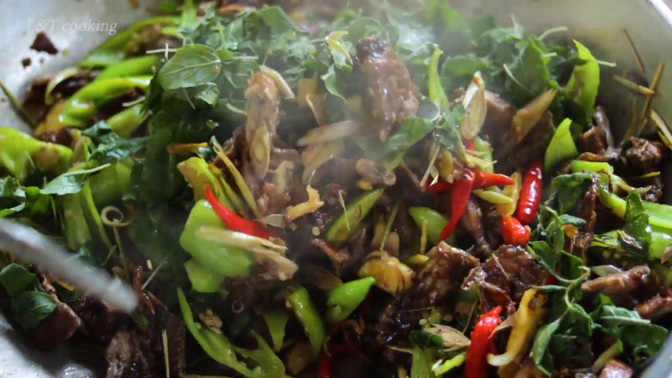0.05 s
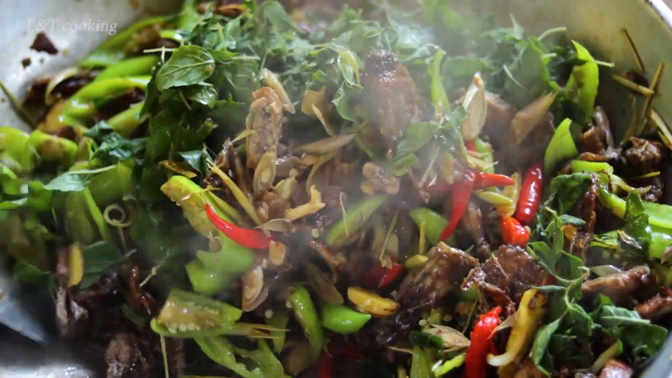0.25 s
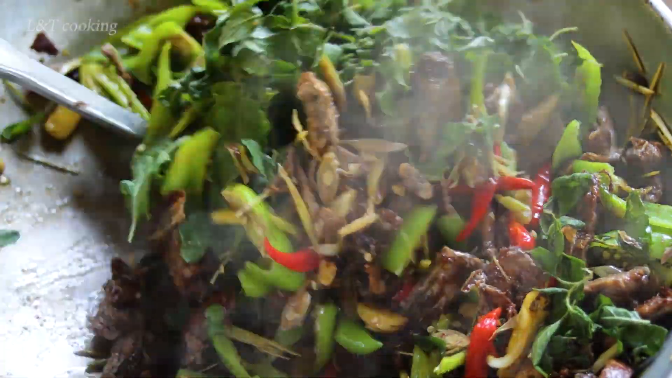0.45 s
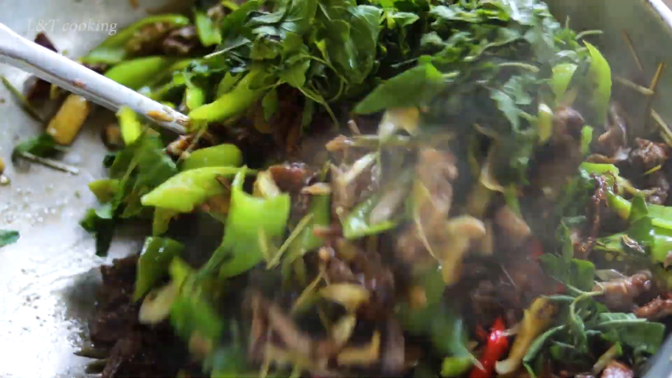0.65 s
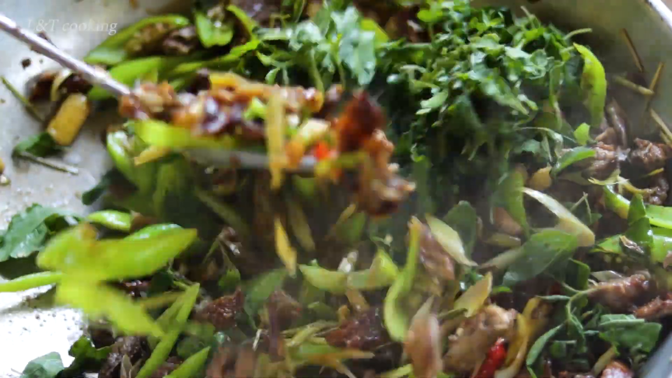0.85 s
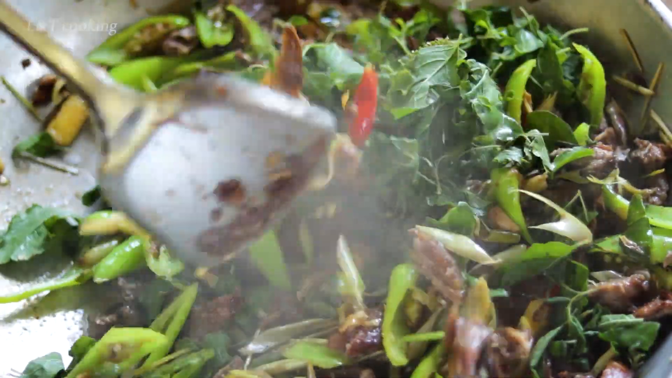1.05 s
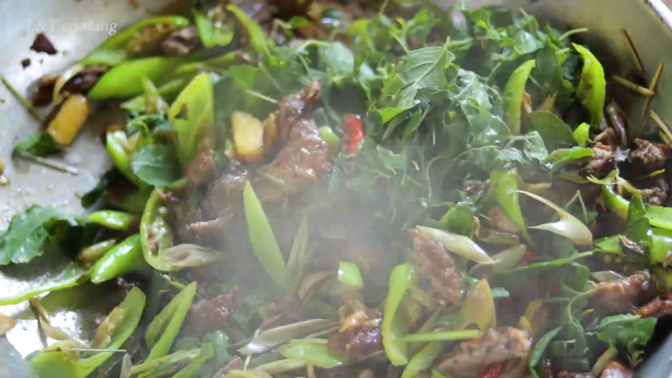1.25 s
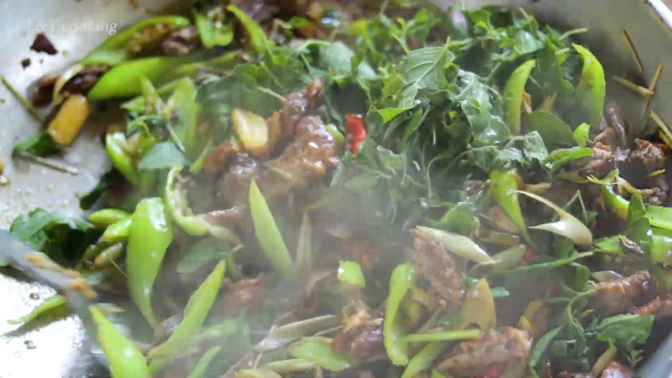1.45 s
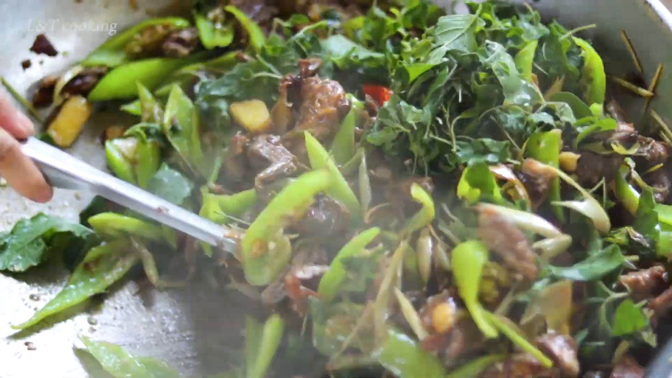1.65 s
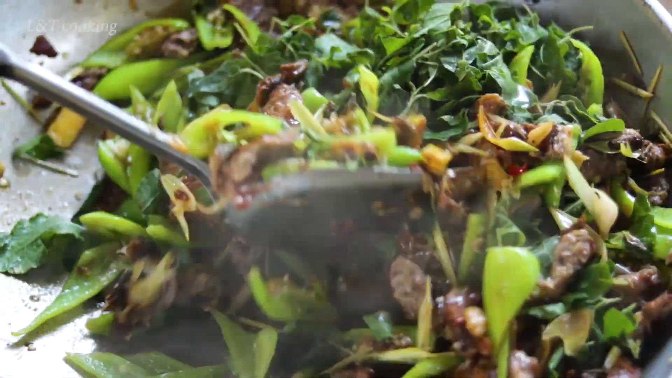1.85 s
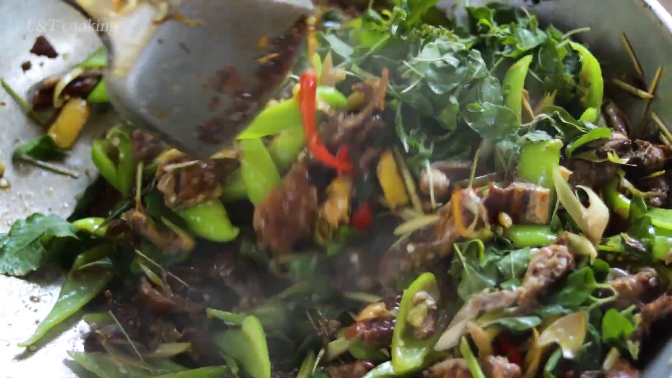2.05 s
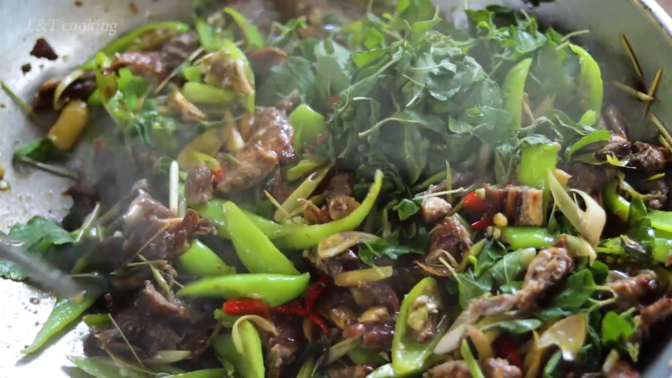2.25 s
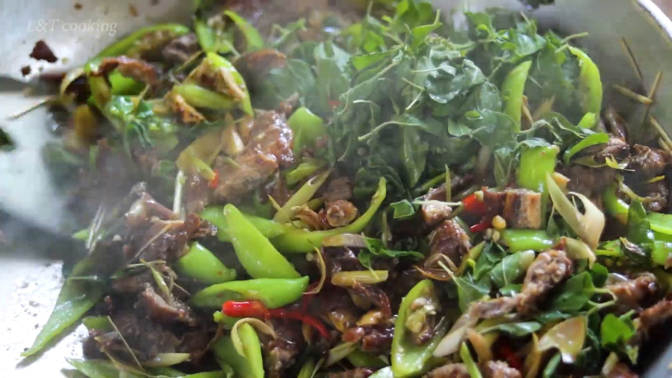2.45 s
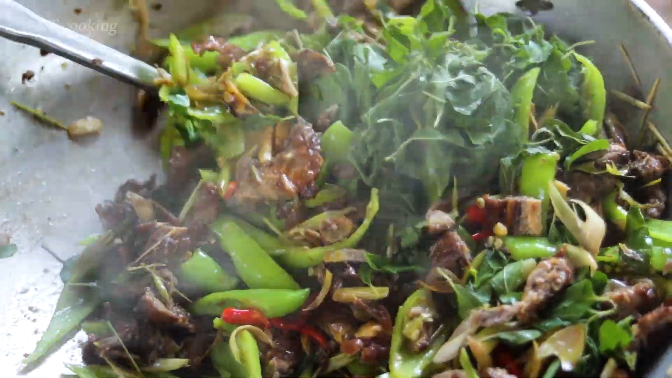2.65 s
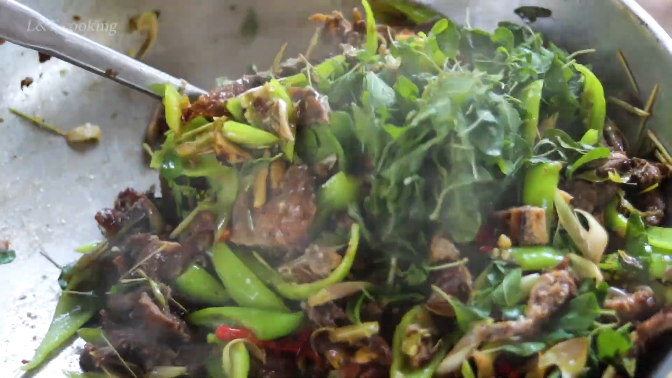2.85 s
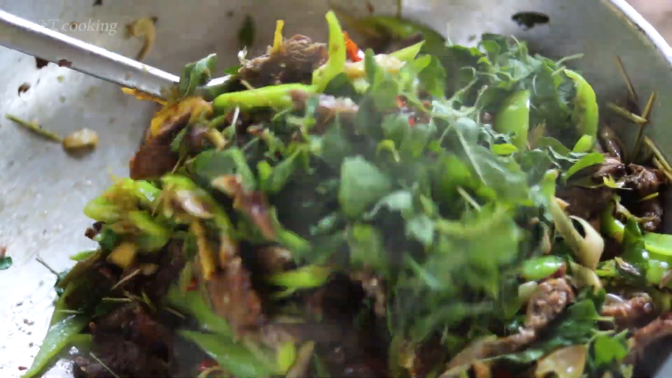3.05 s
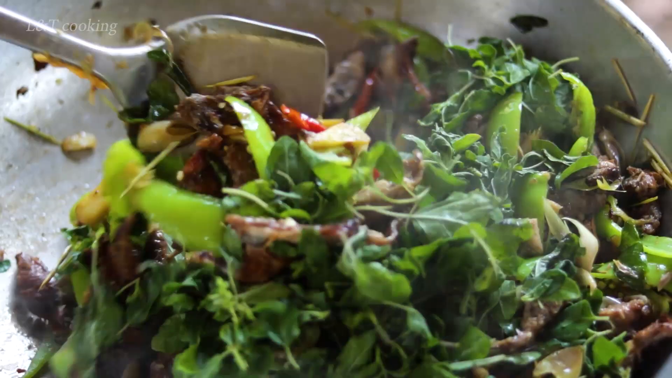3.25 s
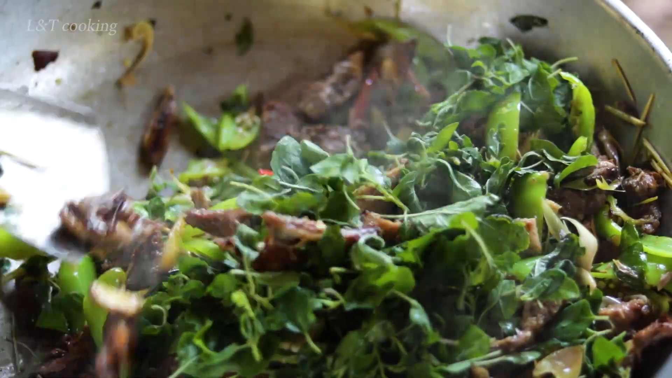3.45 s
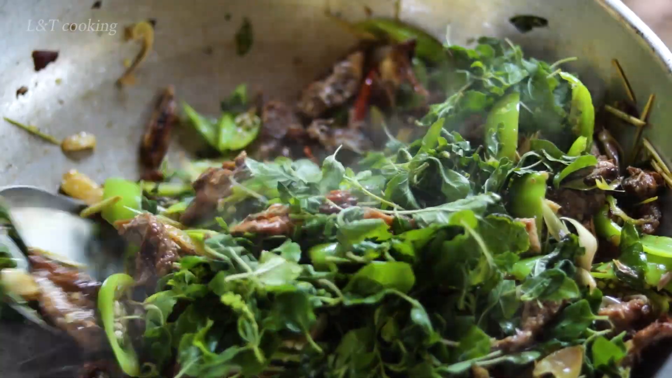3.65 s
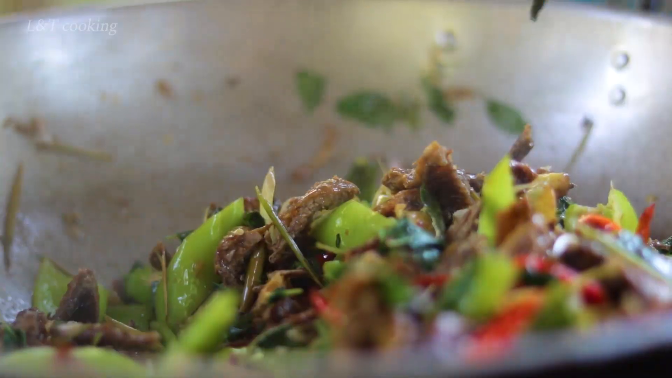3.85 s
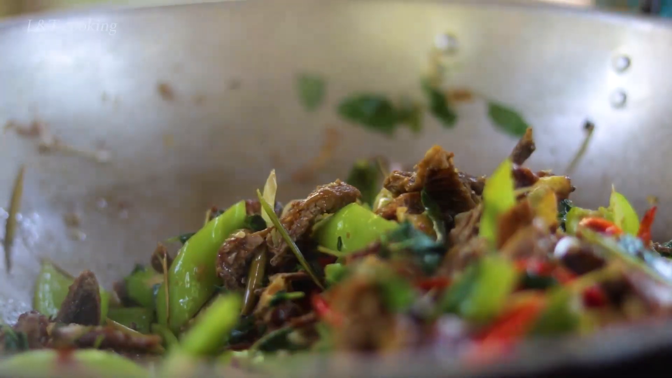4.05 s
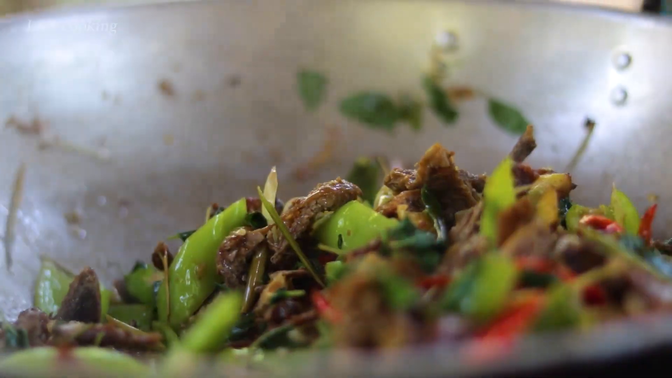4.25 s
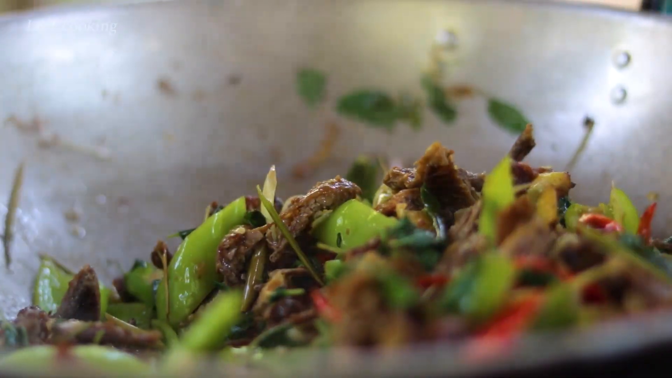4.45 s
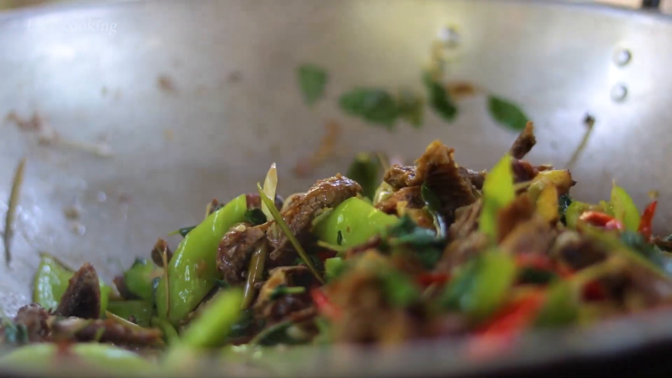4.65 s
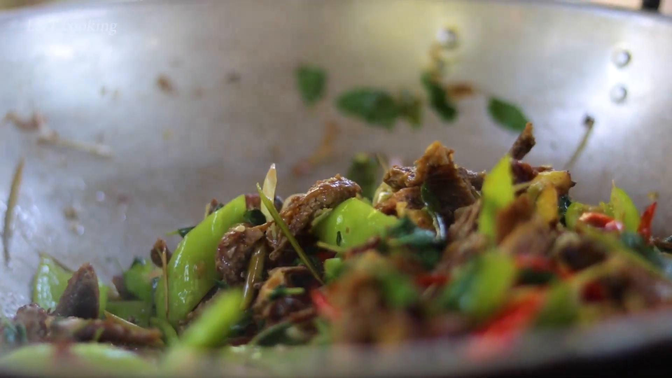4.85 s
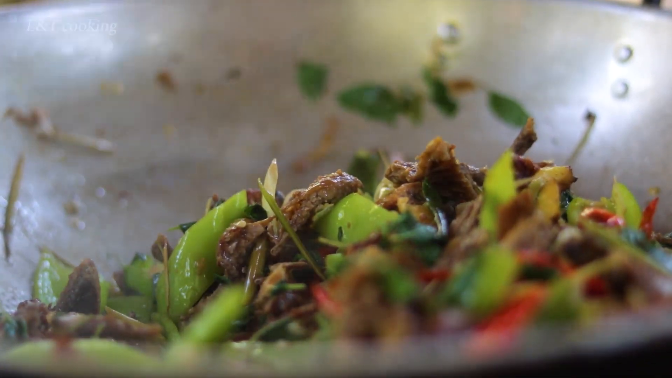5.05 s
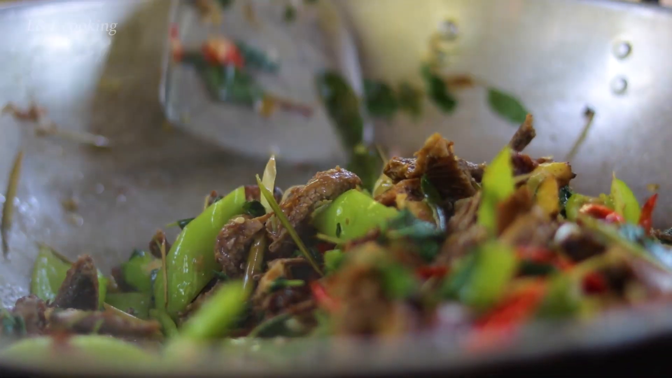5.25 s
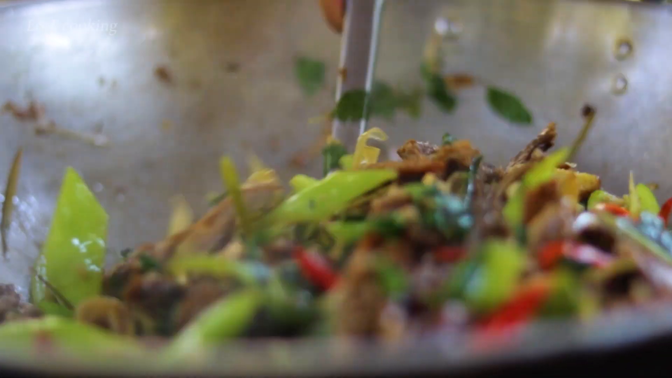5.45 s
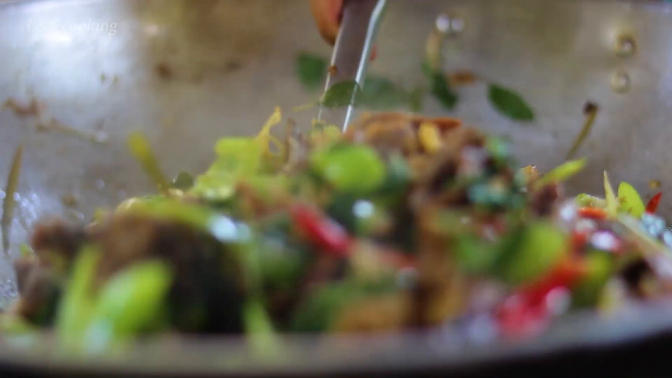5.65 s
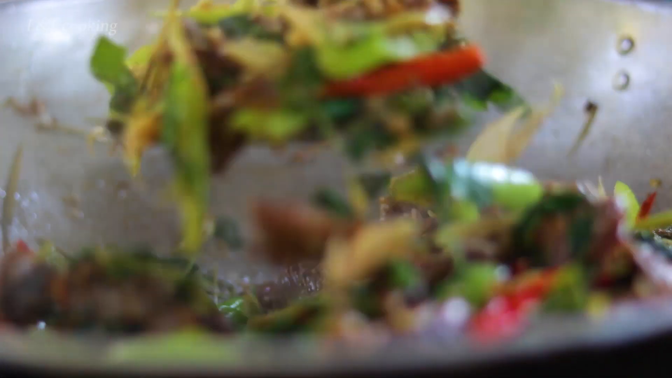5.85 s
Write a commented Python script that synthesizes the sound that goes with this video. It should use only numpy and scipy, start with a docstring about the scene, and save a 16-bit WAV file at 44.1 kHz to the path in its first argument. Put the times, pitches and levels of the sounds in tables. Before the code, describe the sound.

Meat and greens fry in a large steel wok, heard close in stereo with only a little room. A steady, bright, crackling sizzle lies under everything. A spatula scrapes from the start, then strikes hard at about 0.25 s: a bright, cracking clank that food damps almost at once. A strong rasp follows around 0.4 s, with light ticks and rubbing until 1.2 s. Another sharp clank comes at 1.35 s with scrapes to 1.75 s, faint taps near 2 s, and the third at 2.45 s with a short scrape after. Stirring is lighter until a scrape at 3.7 s. A near-silent gap of a few hundredths of a second falls near 3.87 s. Then the sizzle is quieter, duller and further back, over a very faint, wavering low engine idle. A small scrape comes at 4.5 s, a tick at 5.0 s, a loud lower clank and scrape from 5.36 s, and a softer ringing knock at 5.8 s.

```python
"""Meat and herbs sizzle in a steel wok close to a stereo camera; at once a steel spatula scrapes and strikes.
The sizzle is crackling noise; scrapes are grains and noise through steel modes; blows are short decaying modes
with a broad crack and a little room. Food damps every ring. After a near-silent cut the camera is lower and
further back: the sizzle is duller and a far engine idles, three wavering tones over a low rumble."""
import sys
import numpy as np
from scipy import signal
from scipy.fft import rfft, irfft, next_fast_len
from scipy.io import wavfile
from scipy.ndimage import uniform_filter1d, map_coordinates

SR = 44100
rng = np.random.default_rng(int(sys.argv[2]) if len(sys.argv) > 2 else 0)


def wav_record(signal):
    """Record a signal, one row per channel, as 16-bit PCM in the file named by sys.argv[1]."""
    frames = np.transpose(np.atleast_2d(signal))
    bounded = np.clip(frames, -1, 1)
    # unit amplitude maps onto the largest positive 16-bit level
    quanta = np.round(bounded * 32767).astype(np.int16)
    wavfile.write(sys.argv[1], SR, quanta)


N = 261072


def amp(db):
    """Gain of a level in dB."""
    return 10 ** (np.asarray(db) / 20)


def unit(x):
    """x at rms 1."""
    return x / np.sqrt(np.mean(x ** 2) + 1e-20)


def along(points, hz):
    """Interpolate (f/Hz, value) points on a log frequency axis."""
    f, v = np.transpose(points)
    return np.interp(np.log(hz + 1), np.log(f + 1), v)


def curves(rows):
    """One value per sample for each column after t/s."""
    s, *cols = np.transpose(rows)
    return [np.interp(np.arange(N) / SR, s, c) for c in cols]


def wobble(rate):
    """A smooth random curve, rate knots a second."""
    knots = rng.standard_normal(int(N * rate / SR) + 4)
    return map_coordinates(knots, [np.arange(N) * rate / SR])


def filtered(x, response):
    """x times a complex response of frequency."""
    m = next_fast_len(N + SR // 2)
    return irfft(rfft(x, m) * response(np.fft.rfftfreq(m, 1 / SR)), m)[..., :N]


def crackle(per_s, spread_db, share):
    """Two unrelated streams of one-sample bursts of uneven size; share is their part of the power, the rest noise."""
    fires = rng.random((2, N)) < per_s / SR
    sign = rng.choice([-1, 1], (2, N))
    size = sign * amp(spread_db * np.clip(rng.standard_normal((2, N)), -2, 2))
    share = np.clip(share, 0, 1)
    bursts = np.sqrt(share) * unit(fires * size)
    return bursts + np.sqrt(1 - share) * rng.standard_normal((2, N))


def spread(pair, colour, alike, lead_s, patchy_db):
    """Stereo sound of rms 1 from two streams: patches of random gain, a colour, a likeness, left leading."""
    z = signal.stft(pair, nperseg=512)[2]
    field = rng.standard_normal(z.shape[1:])
    field = uniform_filter1d(uniform_filter1d(field, 8, 0), 8, 1)
    pair = signal.istft(z * amp(patchy_db * unit(field)), nperseg=512)[1][:, :N]

    def turn(hz):  # more turn puts more power in the side signal, so left and right differ more
        return np.arccos(np.clip(along(alike, hz), -1, 1)) / 2

    def ramp(hz):  # half the lead on each side
        return np.exp(1j * np.pi * hz * lead_s * np.array([[1], [-1]]))

    mid, side = filtered(pair, lambda hz: colour(hz) * [np.cos(turn(hz)), np.sin(turn(hz))])
    return unit(filtered(np.array([mid + side, mid - side]), ramp))


# near-silent gap between the close and the further position: (start t/s, end t/s)
CUT = (3.8585, 3.8905)
# the far engine, wavered below: (t/s, lowest tone f/Hz, its level/dB)
ENGINE = [(3.895, 46.4, -64), (4.3, 46.4, -65), (4.55, 46.4, -63.5), (4.7, 46.5, -61), (5.25, 46.54, -58.5),
          (5.7, 47.2, -58), (5.92, 47.3, -66)]
# its related tones: (multiple of the lowest tone, level/dB against it)
ORDERS_DB = [(1, 0), (2.5, -5), (3, -4)]
# colour of its rumble: (f/Hz, relative level/dB)
RUMBLE = [(18, -30), (35, -6), (70, -3), (130, -7), (200, -30)]


def engine():
    """A far engine idles after the cut: three related tones waver over a low rumble."""
    hz, db = curves(ENGINE)
    phase = 2 * np.pi * np.cumsum(hz) / SR
    hum = 0
    for multiple, order_db in ORDERS_DB:
        gain = amp(order_db + 1.6 * wobble(5))
        hum = hum + np.sqrt(2) * gain * np.sin(multiple * phase + .25 * wobble(8))
    noise = rng.standard_normal((2, N))
    rumble = spread(noise, lambda f: amp(along(RUMBLE, f)), [(60, .85)], 0, patchy_db=-1.0)
    return (amp(db) * hum + amp(-62.5) * rumble) * (np.arange(N) > CUT[1] * SR)


# how fast the kitchen's answer dies: (f/Hz, t60/s)
KITCHEN = [(200, 0.066), (2000, 0.37), (10000, 0.1)]


def kitchen(x):
    """The room answers 300 samples late with noise; each frequency dies at its own speed."""
    hz, t, z = signal.stft(rng.standard_normal((2, SR // 2)), SR, nperseg=256)
    fade_db = -60 * t / along(KITCHEN, hz)[:, None]
    tail = signal.istft(z * amp(fade_db), SR, nperseg=256)[1]
    late = np.pad(x, ((0, 0), (300, 0)))
    return signal.fftconvolve(late, tail / np.linalg.norm(tail[0]), axes=1)[:, :N]


# sizzle at the microphone, one list per position, before a small wobble: (t/s, level/dB)
SIZZLE = [
    [(0, -40.5), (.6, -39.5), (1.3, -40), (2, -41), (2.4, -40), (2.8, -40.5), (3.4, -41.5), (3.855, -40)],
    [(3.895, -46), (4.6, -44), (5.3, -42.5), (5.55, -44.5), (5.62, -47.5), (5.72, -43.5), (5.92, -42.5)],
]
# colour of the sizzle, close and then further back: (f/Hz, relative level/dB per Hz)
FIZZ_NEAR = [(24, -54), (40, -14), (211, -16.5), (251, -16.5), (331, -15), (508, -17.5), (929, -6.5),
             (1290, -10.5), (1500, -3.5), (1740, -8), (1980, -5.5), (3350, -3), (8720, -9), (15200, -25),
             (16400, -49)]
FIZZ_FAR = [(100, -34), (170, -16.5), (400, -21.5), (660, -15), (900, -22), (1100, -12), (1300, -6.5),
            (1500, -14), (2040, -7.5), (2800, -11.5), (4060, -11), (6500, -16), (9000, -14.5),
            (12000, -23.5), (15200, -27.5), (16400, -42)]
# likeness of left and right, close and then further back: (f/Hz, correlation)
ALIKE_NEAR = [(60, 0.91), (180, 0.67), (550, 0.9), (1650, 0.94), (4970, 0.65), (15000, 0.77)]
ALIKE_FAR = [(60, 0.89), (180, 0.83), (550, 0.74), (1650, 0.92), (4970, 0.37), (15000, 0.2)]


def sizzle():
    """Steam bubbles burst in the oil by the thousand; near colour gives way to far colour in the cut."""
    near = spread(crackle(2500, spread_db=2.5, share=0.28), lambda hz: amp(along(FIZZ_NEAR, hz)),
                  ALIKE_NEAR, 1.8e-5, patchy_db=1.0)
    far = spread(crackle(3500, spread_db=2.5, share=0.36), lambda hz: amp(along(FIZZ_FAR, hz)),
                 ALIKE_FAR, 1.6e-5, patchy_db=0.7)
    level_db, = curves(np.vstack(SIZZLE))
    close_up = np.arange(N) < np.mean(CUT) * SR
    return amp(level_db + 0.4 * wobble(6.6)) * np.where(close_up, near, far)


# spatula strokes along the steel: (hold start t/s, hold/s, rasp level/dB at the start,
# hiss level/dB and bowl rumble level/dB against the rasp)
STROKES = [(0.0, .22, -40, -17, -25), (.3, 0.046, -38.5, -4, -12.5), (.375, 0.14, -32.5, -10, -17),
           (.92, 0.11, -40.5, -1.5, -19.5), (1.11, .18, -39.5, -12, -25), (1.45, 0.091, -38.5, -4.5, -15.5),
           (1.55, 0.11, -37.5, -12, -12.5), (1.68, .04, -44, -8, -10.5), (1.75, 0.022, -39, -6.5, -16.5),
           (2.53, 0.054, -37.5, -1.5, -9), (2.635, 0.022, -32.5, -5, -19), (3.71, .12, -34.5, -9, -20.5),
           (4.49, 0.073, -45, -7, -16), (5.41, 0.12, -36.5, -8.5, -15), (5.8, .12, -45, -5, -14)]
# light rubbing between strokes, close and then further back: (rasp, hiss, bowl) mean level/dB
STIR_NEAR = (-45, -50, -64)
STIR_FAR = (-49, -56, -67.5)
PRESS_DB_PER_S, LIFT_DB_PER_S = 247, 200  # a stroke swells before its hold and fades after it
SAG_DB_PER_S = 16.5  # a stroke slows down while it holds: its level sags


def strokes():
    """Rasp, hiss and bowl level in dB: the loudest of light rubbing and each swelling, holding, fading stroke."""
    t = np.arange(N) / SR
    level_db = np.where(t < np.mean(CUT), np.array(STIR_NEAR)[:, None], np.array(STIR_FAR)[:, None])
    level_db = level_db + np.array([0.91 * wobble(6.03), 2.3 * wobble(6), 3 * wobble(8)])
    for s, hold, db, hiss_db, bowl_db in STROKES:
        shape_db = db - SAG_DB_PER_S * np.clip(t - s, 0, hold)
        shape_db -= PRESS_DB_PER_S * np.maximum(s - t, 0)
        shape_db -= LIFT_DB_PER_S * np.maximum(t - s - hold, 0)
        level_db = np.maximum(level_db, shape_db + np.array([[0], [hiss_db], [bowl_db]]))
    return level_db


def resonances(modes, widen):
    """Response of a set of modes under steady rubbing: powers add, each bandwidth set by its t60."""
    def response(f):
        power = 0
        for centre, db, t60 in modes:
            width = widen * np.log(1000) / (np.pi * t60)
            power = power + abs(amp(db) * f * width / (centre ** 2 - f ** 2 + 1j * f * width)) ** 2
        return np.sqrt(power)
    return response


# colour the rasp and the hiss of the edge: (f/Hz, relative level/dB per Hz)
RASP = [(410, -45), (700, 1), (1010, 1), (1280, -8), (1490, -1), (1960, -5.5), (2550, 2.5), (4900, -5.5),
        (5710, -7), (8000, -14.5), (10400, -56), (17600, -120)]
HISS = [(3500, -60), (5000, -9.5), (8500, -2), (11000, -11), (16400, -18)]
# modes of the wok's bowl, then of spatula and wok wall, before damping or widening; scrape() leaves out
# the STEEL levels, contacts() plays both tables too: (f/Hz, level/dB, t60/s)
BOWL = [(215.4, -2.5, 0.19), (291, -5, 0.077), (336.4, 1.5, 0.048), (422, -2.5, 0.043), (513, -1.5, 0.042),
        (614, -3, 0.047), (771, -11.5, 0.097)]
STEEL = [(1130, -4.5, 0.048), (1297, -2.5, 0.058), (1410, -4, 0.045), (1564, -12.5, 0.092),
         (1780, -8, 0.054), (1930, -5, 0.051), (2114, -6, 0.056), (2317, -6.5, 0.07), (2625, -5.5, 0.068),
         (2874, -1, 0.034), (3116, -0.5, 0.024), (3410, -6.5, 0.026), (3806, -1, 0.036), (4080, 0.5, 0.029),
         (4360, -4, 0.039), (4595, -3.5, 0.046), (4935, -2.5, 0.063), (5306, -2.5, 0.046),
         (5890, -6.5, 0.019), (7430, -15.5, 0.04), (8510, 4, 0.023), (9900, -8, .018), (11350, 6.5, 0.025)]


def scrape():
    """The edge stutters over the steel: grains excite the wall modes, a hiss and the bowl."""
    rasp_db, hiss_db, bowl_db = strokes()
    stutter = wobble(45)
    wall = resonances([(hz, 0, t60) for hz, db, t60 in STEEL], widen=3.15)
    bowl_modes = resonances(BOWL, widen=.55)

    def bowl_colour(hz):  # strongest around 330 Hz
        return bowl_modes(hz) * amp(-8 * np.log2((hz + 1) / 330) ** 2)

    grains = crackle(1100, spread_db=4.5, share=0.45)  # one set of slips for rasp and hiss
    rasp = spread(grains, lambda hz: amp(along(RASP, hz)) * wall(hz), ALIKE_NEAR, 3e-5, patchy_db=1.5)
    hiss = spread(grains, lambda hz: amp(along(HISS, hz)), [(5000, 0.15), (15000, 0.12)], 4.5e-5, patchy_db=5.0)
    bowl = spread(crackle(120, spread_db=6, share=0.5), bowl_colour, [(300, 0.99)], 0, patchy_db=1.5)
    rubbing = amp(rasp_db + 1.66 * stutter) * rasp + amp(hiss_db + stutter) * hiss
    return rubbing + amp(bowl_db) * bowl


def ring(modes, peak_db, region_db, damping, attack_s, draw):
    """One blow: each mode at a new strength, a little different at the two microphone ports, left leading."""
    hz, db, t60 = np.transpose(modes)[:, :, None]
    delay = np.array([0, 4e-5])[:, None, None]  # s, left and right
    t = np.maximum(np.arange(SR // 4) / SR - delay, 0)
    sides_db = 1.15 * draw[1, :, None] * np.array([1, -1])[:, None, None] * np.clip(hz / 3000, 0, 1)
    level = db + region_db + 3.4 * draw[0, :, None] + sides_db
    detuned = hz * (1 + 0.0063 * draw[2, :, None])
    tone = np.sin(2 * np.pi * detuned * t + 1.69 * draw[3, :, None])
    envelope = amp(level - 60 * damping * t / t60) * (1 - np.exp(-t / attack_s))
    blow = np.sum(envelope * tone, axis=1)
    return amp(peak_db) * blow / np.abs(blow.mean(axis=0)).max()


def region_db(modes, hz, octaves):
    """Fall of each mode's level in dB away from the loudest region, 6 dB at the given width."""
    distance = np.log2(np.transpose(modes)[0][:, None] / hz)
    return -6 * (distance / max(octaves, .1)) ** 2


# contacts of spatula and wok; ring levels get a fixed offset below: (t/s, level/dB, bowl level/dB against it,
# loudest wall region f/Hz, its width/octaves, loudest bowl region f/Hz)
CONTACTS = [(.2456, -2.5, -23.5, 4100, 0.62, 270), (0.2463, -4, -32, 4020, 0.22, 500),
            (0.249, -6, -24, 4030, .3, 260), (0.2565, -7, -27, 3900, 0.43, 288),
            (.2605, -13, -27, 3020, 0.3, 624), (.265, -23, -21, 1570, 0.46, 320),
            (0.274, -29, -18, 1570, .27, 215), (0.3574, -12, -34, 3520, 0.27, 490),
            (.365, -19, -34, 2600, .5, 336), (0.4079, -21, -26, 2200, 0.58, 611),
            (0.427, -25, -35, 2120, .59, 310), (0.43, -19, -32, 2180, .6, 312),
            (0.4926, -29, -16, 1430, .55, 331), (.556, -31.5, -12, 1430, .5, 353),
            (0.5918, -28, -38, 3000, .33, 336), (.769, -28.5, -17, 3300, .5, 286),
            (0.8726, -23, -7.5, 1820, .66, 394), (.912, -28, -26, 1700, 0.45, 331),
            (0.9871, -23, -23, 3640, .48, 315), (1.007, -34, -13, 2630, .5, 217),
            (1.3523, -3.5, -18.5, 3900, 1.24, 302), (1.3566, -8.5, -19.5, 3300, 1.3, 270),
            (1.3642, -21.5, -7.5, 2700, 0.92, 398), (1.4427, -34, -11, 3340, .44, 323),
            (1.5428, -26, -15, 3180, .49, 318), (1.617, -23.5, -28, 1600, 0.38, 417),
            (1.9109, -25, -23, 1510, .4, 334), (1.94, -24, -35, 2170, 1, 369),
            (2.011, -27, -21, 1240, 0.59, 374), (2.445, -1.5, -25, 4270, 0.94, 293),
            (2.449, -7.5, -25, 4720, 0.85, 215), (2.517, -31, -6.5, 1560, 0.38, 330),
            (2.54, -25, -29, 3140, .6, 342), (2.576, -25, -16, 2240, 1, 350),
            (2.6164, -24.5, -15, 2800, 1, 315), (2.8008, -34, -10.5, 3000, .5, 350),
            (2.8468, -27, -37, 3300, 0.69, 760), (3.301, -26, -25, 3100, .3, 336),
            (3.464, -29.5, -21, 2980, .45, 334), (3.6653, -28, -12.5, 3870, .5, 333),
            (4.529, -31, -12.5, 2100, 0.79, 393), (5.028, -27.5, -34.5, 1640, 0.56, 347),
            (5.362, -6, -20, 2170, 0.51, 370), (5.366, -5.5, -34, 2750, 1, 500),
            (5.3727, -9, -18, 2880, 0.5, 770), (5.379, -12.5, -20.5, 2850, .36, 330),
            (5.385, -17, -21, 2850, .28, 320), (5.5396, -30, -32, 1450, .23, 630),
            (5.678, -28.5, -17, 1400, 0.12, 400), (5.686, -28, -39, 1420, 0.17, 400),
            (5.735, -33.5, -38, 1130, .2, 662), (5.7938, -29, -16, 1200, 0.24, 390),
            (5.802, -15, -22, 1137, 0.1, 362), (5.8364, -33.5, -10, 1200, .3, 362)]
# colour of the first instant of a blow: (f/Hz, level/dB per Hz)
CRACK = [(500, -43), (1200, -23), (4000, 1), (6500, 4), (8400, 6.5), (10000, 0.5), (12000, -5),
         (16400, -14)]
CRACK_DB, CRACK_DB_PER_OCTAVE = -13, 9  # for a contact ringing at 4 kHz; brighter contacts crack harder
DAMPING, DAMPING_PER_OCTAVE = 1.76, .4  # food shortens a 4 kHz contact's ring by this factor, brighter more
BOWL_DAMPING = 1.05  # the same factor for the bowl


def contacts():
    """Where the edge lands decides which modes ring loudest; each blow adds a broad crack and a short bowl thud."""
    rings, cracks = np.zeros((2, N + SR)), np.zeros((2, N + SR))
    draws = rng.standard_normal((len(CONTACTS), 4, len(STEEL)))
    t = np.arange(2000) / SR
    noise = rng.standard_normal((len(CONTACTS), 2, len(t) + 2))
    for (s, db, bowl_db, wall_hz, octaves, bowl_hz), draw, (a, b) in zip(CONTACTS, draws, noise):
        start = round(s * SR)
        bright = np.log2(wall_hz / 4000)
        crack_db = CRACK_DB + CRACK_DB_PER_OCTAVE * bright
        damping = max(DAMPING + DAMPING_PER_OCTAVE * bright, .3)
        # a brighter blow wakes more of the modes outside the loudest region
        wall_db = np.maximum(region_db(STEEL, wall_hz, octaves), crack_db - 1)
        bowl_region_db = np.maximum(region_db(BOWL, bowl_hz, 0.36), -13)
        blow = ring(STEEL, db - 3.0, wall_db, damping, 0.0001, draw)
        blow += ring(BOWL, db + bowl_db + 4.5, bowl_region_db, BOWL_DAMPING, 0.00094, draw[:, :len(BOWL)])
        rings[:, start:][:, :blow.shape[1]] += blow
        burst = np.array([a[2:] + 0.86 * b[2:], a[:-2] - 0.61 * b[:-2]])  # left two samples early
        cracks[:, start:][:, :len(t)] += amp(db + crack_db - 60 * damping * t / 0.03) * burst

    def small_source(hz):  # the wok radiates no deep bass
        return (1j * hz / 150) ** 3 / (1 + 1j * hz / 150) ** 3

    return filtered(rings[:, :N], small_source) + filtered(cracks[:, :N], lambda hz: amp(along(CRACK, hz)))


def scene():
    """Sizzle, strokes, blows with their room, engine."""
    blows = contacts()
    return sizzle() + scrape() + blows + amp(-21) * kitchen(blows) + engine()


# shading of the two microphone ports by the camera body: (f/Hz, left minus right level/dB)
PORTS = [(60, 0.0), (110, 0), (200, 1), (380, 0), (700, 1.0), (1290, 0.5), (2380, -3), (4400, 1),
         (8120, 0.5), (15000, 3)]
TOP_HZ = 16200  # band limit


def record(dry):
    """The camera body shades the ports; the cut mutes; the loudest peaks clip; nothing stays above the band limit."""
    shaded = filtered(dry, lambda hz: amp(along(PORTS, hz) * np.array([[.5], [-.5]])))
    t = np.arange(N) / SR
    fading = amp(-21 - 1800 * np.maximum(t - CUT[0], 0))  # a faint remnant dies within the cut
    cut = np.where((t > CUT[0]) & (t < CUT[1]), fading, 1)
    return filtered(np.clip(shaded * cut, -1, 1), lambda hz: hz < TOP_HZ)


dry = scene()
out = record(dry)
wav_record(out)
```